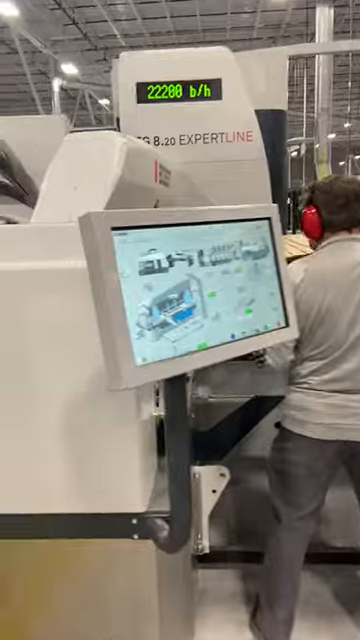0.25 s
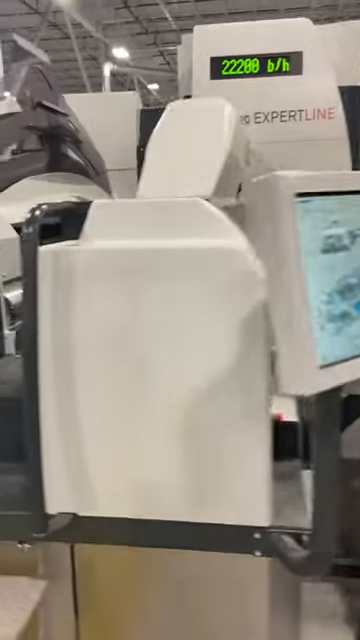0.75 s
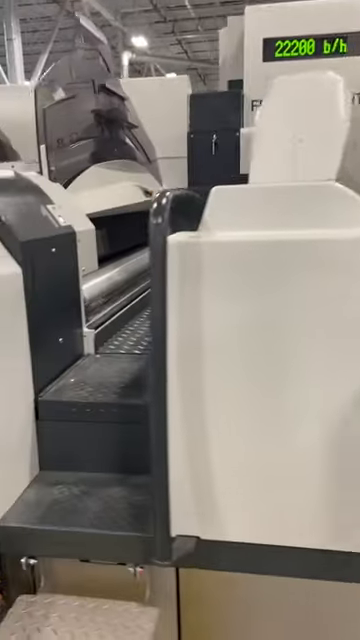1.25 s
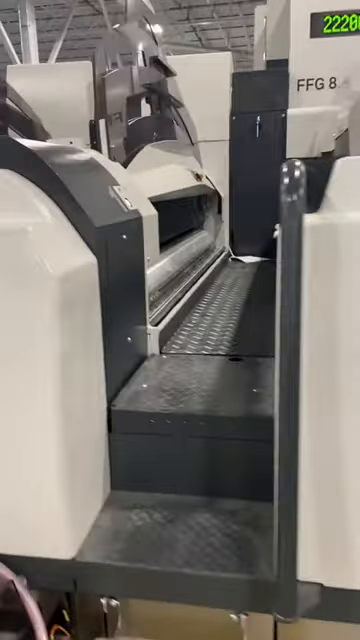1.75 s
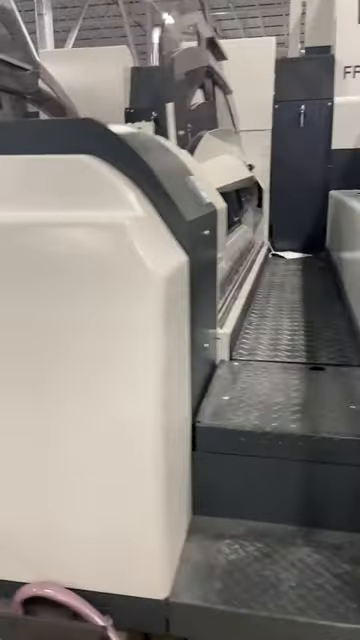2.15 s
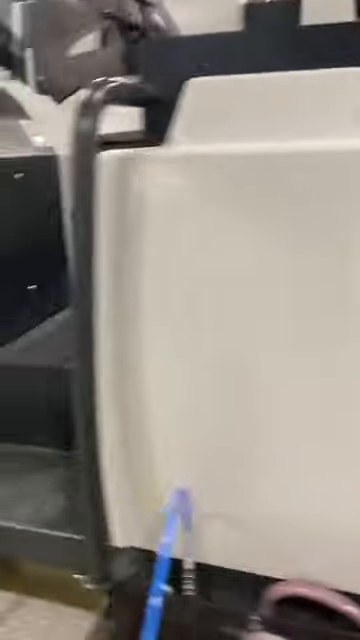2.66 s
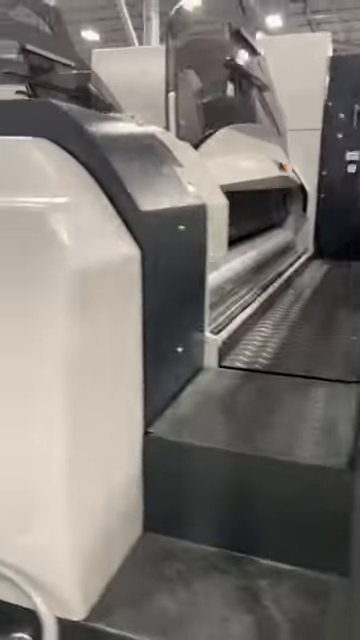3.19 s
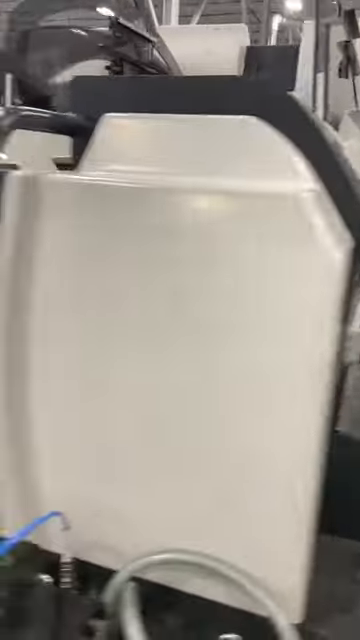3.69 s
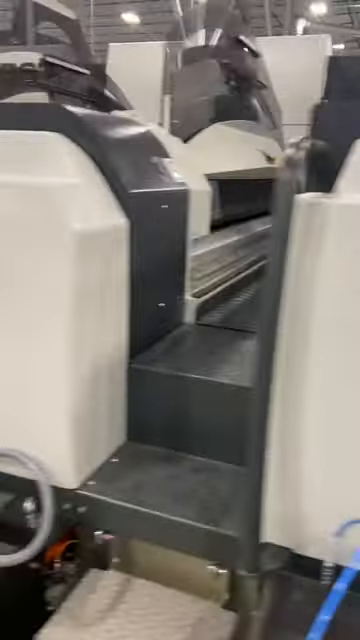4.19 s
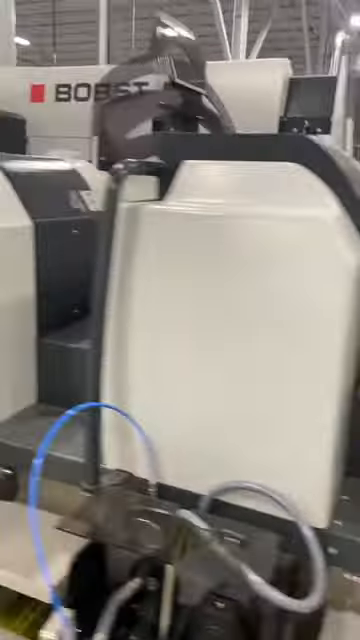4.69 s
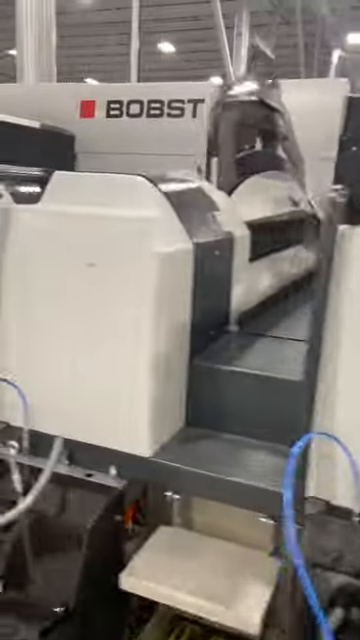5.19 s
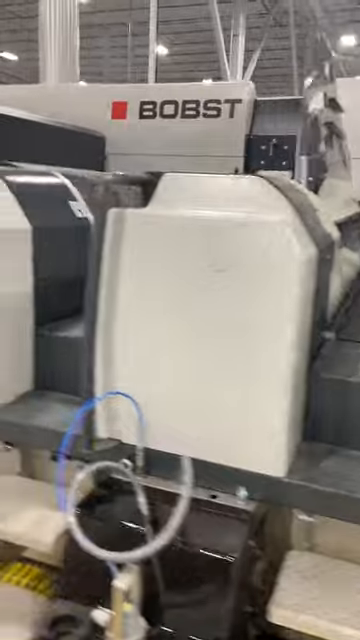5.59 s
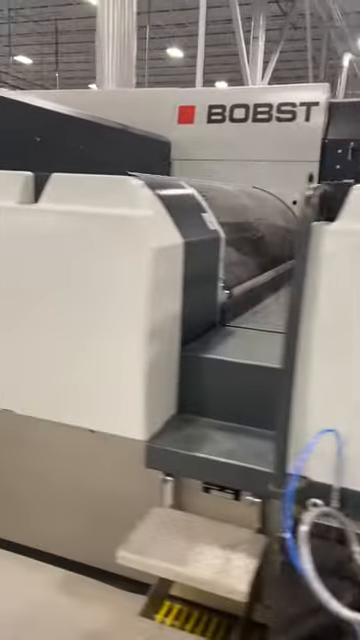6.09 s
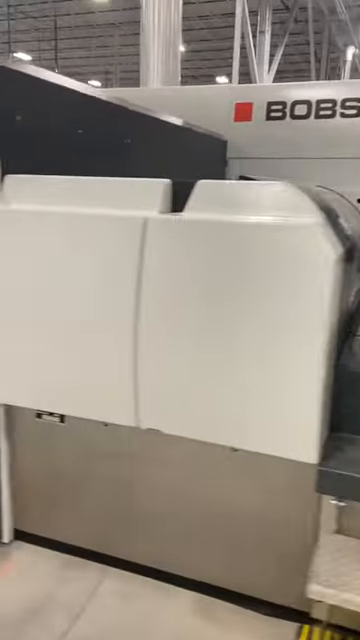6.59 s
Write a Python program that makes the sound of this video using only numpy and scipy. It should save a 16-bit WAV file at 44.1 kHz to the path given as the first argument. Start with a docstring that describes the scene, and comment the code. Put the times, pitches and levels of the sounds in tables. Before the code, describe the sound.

In a large factory hall, a cardboard-folding machine runs very fast, about six cycles a second. Dull booming thumps, slapping sheets, ringing metal and short air puffs repeat in every cycle. As the handheld stereo microphone moves along close by, the slaps fade, a hollow panel note rattles early on, and the sound evens into blower rush, thin whines and faint ticks.

```python
"""A box folder-gluer running at 22200 boxes an hour booms through its covers as one walks along it in a large hall.
Damped blows, a shaking frame, slapping sheets, puffs of air and knocks recur in every machine cycle.
Noise shaped by spectra gives the clatter and rush; resonances excited by noise give the ringing and whines.
The feed end falls behind, leaving the even rush of blowers and rollers, the whine of the drives and a light tick.
Two microphone ports hear it alike in the bass and out of step in the treble."""
import sys
import numpy as np
from scipy import signal
from scipy.fft import rfft, irfft, next_fast_len
from scipy.io import wavfile

SR = 44100
rng = np.random.default_rng(int(sys.argv[2]) if len(sys.argv) > 2 else 0)


def wav_record(signal):
    """Record a signal, one row per channel, as 16-bit PCM in the file named by sys.argv[1]."""
    frames = np.transpose(np.atleast_2d(signal))
    bounded = np.clip(frames, -1, 1)
    # unit amplitude maps onto the largest positive 16-bit level
    quanta = np.round(bounded * 32767).astype(np.int16)
    wavfile.write(sys.argv[1], SR, quanta)


N = 302085
TIME = np.arange(N) / SR
CYCLE = 0.16218  # s, one box

# In all tables nearest_s is when a sound is closest, span_s how long before and after it fades by 1/e.
# Table levels are those of the bare sound, before the gains in its function.

# blows on the covers, one per cycle each: peak_in_cycle_s, level_db, pitch_hz, fade_s, nearest_s, span_s
COVER_BLOWS = [(0.0868, -14.1, 163.2, 0.033, 0.3, 0.35), (0.1604, -13.1, 105.4, 0.054, 0.51, 2.19),
               (0.1028, -12.6, 95.3, 0.022, 0.6, 1.67), (0.0313, -16.8, 80.3, 0.054, 0.97, 1.37),
               (0.066, -22.8, 148.3, 0.054, 1.7, 1.87), (0.1172, -9.1, 141.7, 0.008, 1.71, 1.23),
               (0.0734, -17.6, 71.1, 0.054, 1.75, 2.5), (0.1374, -10.0, 106.9, 0.054, 2.43, 1.94),
               (0.0985, -17.5, 155.0, 0.054, 2.5, 0.75), (0.1325, -13.7, 89.9, 0.037, 2.53, 2.2),
               (0.0884, -15.7, 114.2, 0.022, 2.57, 1.88), (0.0098, -13.8, 102.6, 0.03, 2.72, 2.5),
               (0.1479, -12.9, 106.5, 0.043, 3.17, 0.36), (0.0331, -22.9, 185.0, 0.029, 3.33, 0.84),
               (0.1309, -22.8, 184.2, 0.054, 3.53, 2.5), (0.0962, -13.6, 134.1, 0.054, 4.18, 2.5),
               (0.1355, -22.4, 135.7, 0.054, 4.57, 2.26), (0.0758, -15.3, 122.9, 0.046, 4.58, 1.67),
               (0.0905, -13.3, 68.0, 0.025, 6.03, 0.93), (0.0075, -23.3, 121.0, 0.054, 6.06, 2.39),
               (0.0, -15.4, 139.7, 0.016, 6.13, 0.7), (0.1291, -14.2, 93.0, 0.012, 6.67, 1.29)]
# partials of a blow: pitch_multiple, level_db
BLOW_PARTIALS = [(.62, -14), (1, 0), (1.25, -10.5), (1.8, -15)]
# tone colour of the blows, fullest near 70 and 142 Hz: frequency_hz, gain_db
BLOW_COLOUR = [(30, -5), (50, 0), (70, 1.2), (90, .8), (105, -.8), (125, .7), (142, 1.6), (185, -.5),
               (260, -4)]


def covers(rise_s=0.0098, uneven_db=0.4):
    """Damped free vibration: each unit's blow makes the covers heave for a few swings, loudest as it is passed."""
    out = np.zeros(N)
    turn = np.linspace(-CYCLE / 4, 3 * CYCLE / 4, 1024)
    age = turn + CYCLE * np.arange(2)[:, None]  # the second row is the tail of the blow before
    for peak_s, db, pitch_hz, fade_s, nearest_s, span_s in COVER_BLOWS:
        heave = np.exp(-(np.minimum(age, 0) / rise_s) ** 2 - np.maximum(age, 0) / fade_s)
        swings = sum(amp(part_db) * np.cos(2 * np.pi * multiple * pitch_hz * age)
                     for multiple, part_db in BLOW_PARTIALS)
        one_cycle = (heave * swings).sum(0)
        repeated = np.interp(TIME - peak_s, turn, one_cycle, period=CYCLE)
        out += amp(db) * repeated * passing(nearest_s, span_s)
    size = next_fast_len(N)
    hz = np.fft.rfftfreq(size, 1 / SR)
    coloured = irfft(rfft(out, size) * amp(read(BLOW_COLOUR, hz)), size)[:N]
    return coloured * uneven(uneven_db)


# shaking of the frame: frequency_hz, density_db_per_hz
FRAME_SPECTRUM = [(15, -80), (30, -60), (43, -51), (55, -47.5), (80, -44.5), (130, -45.5), (200, -46.5),
                  (260, -44.5), (370, -53), (470, -49.5), (650, -52), (1000, -65.5), (2000, -66.5),
                  (6000, -100)]


def frame(level_db=-1):
    """Forced vibration: the heavy frame shakes under the working stroke, nearly alike each cycle."""
    working = stroke(start_s=0.038, attack_s=0.032, hold_s=0.057, release_s=0.051, rest_db=-5.0)
    working = working * uneven(spread_db=0.4)
    shaking = rattle(FRAME_SPECTRUM, repeat=0.94, repeat_hz=830)
    return amp(level_db) * shaking * working * passing(nearest_s=2.7, span_s=2.6, far_db=-4.5)


# slap of a sheet entering the rolls: frequency_hz, density_db_per_hz
SLAP_SPECTRUM = [(300, -58.5), (550, -48.5), (780, -57), (1050, -54), (1500, -59), (2200, -58.5),
                 (3000, -70.5), (6000, -71), (12000, -97)]
# sheets heard singly near the feed end: start_s, length_s, level_db
SHEET_SLAPS = [(.045, 0.12, 1), (0.181, .115, 0.5), (0.34, 0.098, 3), (0.5, .11, 1), (0.666, .11, 0.5),
               (0.824, .11, -0.5), (0.99, .11, 0), (1.146, .11, -3), (1.312, 0.11, -3.5), (1.478, .115, -4),
               (1.648, 0.099, -7)]


def sheet_slaps(level_db=-0.5):
    """Impact noise: each sheet slaps into the rolls under its own rounded envelope, with a rising resonance."""
    slapping = sum(amp(db) * swell(start_s, length_s, skew=0.87) for start_s, length_s, db in SHEET_SLAPS)
    noise = rattle(SLAP_SPECTRUM, repeat=0.56, repeat_hz=2000)
    return amp(level_db) * (noise + scoop(level_db=-24)) * slapping


def scoop(level_db, centre_hz=1030, half_width_hz=45, rise_hz_per_s=4500, start_s=0.02):
    """Cavity resonance: it rises as each sheet is drawn in and the gap behind it closes."""
    # a straight rise for a third of the cycle, then a held pitch
    offset_hz = rise_hz_per_s * (np.minimum((TIME - start_s) % CYCLE, CYCLE / 3) - CYCLE / 5)
    shift = np.exp(2j * np.pi * np.cumsum(offset_hz) / SR)
    return (signal.hilbert(resonances([(centre_hz, half_width_hz, level_db)])) * shift).real


# clatter of sheets in the rolls: frequency_hz, density_db_per_hz
CLATTER_SPECTRUM = [(100, -51), (250, -45), (550, -45.5), (800, -52.5), (1150, -50), (1500, -58.5),
                    (2300, -62.5), (3300, -63), (5500, -67), (7500, -76), (10000, -85.5), (15500, -95)]


def sheet_clatter(level_db=-4.2, later_db=-13):
    """Modulated contact noise: sheets clatter through the rolls once a cycle, here and at a later unit."""
    here = stroke(start_s=0.016, attack_s=0.033, hold_s=0.052, release_s=0.06, rest_db=-10.5)
    here = here * uneven(spread_db=0.6) * passing(nearest_s=0.33, span_s=2.23, far_db=-15.5)
    later = stroke(start_s=0.042, attack_s=0.028, hold_s=0.045, release_s=0.04, rest_db=-15)
    later = later * passing(nearest_s=3.55, span_s=1.1)
    noise = rattle(CLATTER_SPECTRUM, repeat=0.67, repeat_hz=900)
    return noise * np.hypot(amp(level_db) * here, amp(later_db) * later)


# sheet-metal resonances of the feed end: frequency_hz, half_width_hz, level_db
METAL_RINGS = [(563, 18, -30), (1116, 14, -35.5)]


def sheet_metal():
    """Resonance: the sheet metal rings in each cycle, here and at a later unit."""
    ringing = stroke(start_s=0.047, attack_s=0.022, hold_s=0.081, release_s=0.051, rest_db=-10)
    here = passing(nearest_s=0.37, span_s=1.3, far_db=-8.5)
    later = amp(-12) * passing(nearest_s=3.66, span_s=0.35)
    return resonances(METAL_RINGS) * ringing * uneven(spread_db=1) * (here + later)


def feeder():
    """Superposition: slaps and clatter share the flutter of many small contacts, and the sheet metal rings."""
    flutter = uneven(spread_db=1.5, every_s=0.005)
    return (sheet_slaps() + sheet_clatter()) * flutter + sheet_metal()


# sheets and guides clacking out of the clatter: peak_s, level_db, centre_hz
CLACK_EVENTS = [(0.092, -14, 460), (0.127, -20, 540), (0.223, -19, 600), (0.366, -19, 620),
                (0.391, -15, 490), (0.556, -16, 420), (0.593, -18, 620), (0.715, -16, 380),
                (0.755, -17, 570), (0.88, -18, 440), (1.037, -16, 450), (1.201, -19, 340),
                (1.239, -18, 580), (1.336, -19, 530), (1.38, -20, 410), (1.541, -20, 590), (1.7, -16, 540),
                (1.767, -21, 450), (1.859, -18, 680), (2.033, -19, 500), (2.171, -18, 470),
                (2.345, -20, 360), (2.402, -22, 640), (2.505, -19, 410), (2.674, -20, 560),
                (2.835, -22, 420), (2.858, -19, 520), (3.01, -21, 540), (3.161, -22, 460),
                (3.311, -22, 830), (3.359, -21, 450), (3.477, -22, 440), (3.503, -20, 560),
                (3.544, -21, 520), (3.64, -21, 330), (3.674, -20, 500), (4.005, -19, 470),
                (4.156, -20, 390), (4.448, -24, 420), (4.616, -21, 370), (4.639, -23, 630),
                (4.711, -21, 360), (4.941, -24, 590), (5.011, -24, 490), (5.103, -20, 530),
                (5.213, -25, 520), (5.279, -23, 530), (5.302, -20, 470), (5.399, -22, 560),
                (5.545, -23, 450), (5.619, -24, 450), (5.712, -24, 580), (5.784, -23, 560),
                (5.869, -25, 590), (5.934, -21, 390), (6.026, -25, 630), (6.083, -24, 580),
                (6.196, -24, 590), (6.277, -22, 450), (6.41, -25, 420), (6.432, -25, 600),
                (6.492, -24, 460), (6.589, -22, 550), (6.753, -21, 380)]


def clacks(level_db=-1.0, edge_db=-16, edge_hz=1500, count=12, rise_s=0.003, fade_s=0.009, spread_octaves=0.5):
    """Modal excitation: each clack shakes fresh damped panel modes, with a brighter edge from the contact."""
    out = np.zeros((2, N))
    for peak_s, db, centre_hz in CLACK_EVENTS:
        near = abs(TIME - peak_s) < CYCLE / 2
        age = TIME[near] - peak_s
        blow = np.exp(-(np.minimum(age, 0) / rise_s) ** 2 - np.maximum(age, 0) / fade_s)
        for hz, part_db in ((centre_hz, level_db), (edge_hz, edge_db)):
            modes_hz = hz * 2 ** (spread_octaves * rng.standard_normal((count, 1)))
            angle = 2 * np.pi * (modes_hz * age + rng.random((count, 1)))
            left = np.cos(angle).sum(0)
            right = np.cos(angle - read(PORT_LEAD, modes_hz)).sum(0)
            ring = blow * np.array([left, right])
            evened = np.sqrt(np.mean(blow ** 2) / np.mean(ring ** 2))
            out[:, near] += amp(db + part_db) * ring * evened
    return out


# linkage knocks, one per cycle each: start_in_cycle_s, level_db, centre_hz, nearest_s, span_s
LINKAGE_KNOCKS = [(.105, -21, 248, .35, 0.75), (0.062, -23, 450, 0.72, 0.47),
                  (0.0623, -22, 420, 2.33, 0.63), (0.084, -22.5, 230, 3.12, 0.63),
                  (.065, -24.5, 590, 3.5, .5), (.09, -27, 340, 5.2, 1.5), (.018, -28, 330, 5.7, 1.1)]


def knocks(half_width_share=0.2):
    """Broad, heavily damped resonance: linkages knock dully once a cycle, each heard as it is passed."""
    out = 0
    for start_s, db, hz, nearest_s, span_s in LINKAGE_KNOCKS:
        knocking = stroke(start_s, attack_s=0.013, hold_s=0.014, release_s=0.068, rest_db=-16)
        dull = resonances([(hz, half_width_share * hz, db)])
        out = out + dull * knocking * passing(nearest_s, span_s)
    return out


# hiss of escaping air: frequency_hz, density_db_per_hz
AIR_SPECTRUM = [(1000, -83), (3000, -86), (5500, -66), (7500, -72.5), (9500, -75), (12000, -76.5),
                (15500, -80)]


def air(feed_db=-1.0, folder_db=-11, vent_db=-4, vent_s=2.235, vent_rise_s=0.04, vent_fade_s=0.058):
    """Turbulent jet noise: puffs once a cycle at the feed end, fainter at the folder, and one valve hiss."""
    puffs = stroke(start_s=0.14, attack_s=0.043, hold_s=0.021, release_s=0.055, rest_db=-10.0)
    feed = amp(feed_db) * passing(nearest_s=0.25, span_s=1.22, far_db=-20)
    folder = amp(folder_db) * passing(nearest_s=7.4, span_s=1.2)
    age = TIME - vent_s
    opening = np.clip(age / vent_rise_s, 0, 1)
    emptying = np.exp(-np.maximum(age - vent_rise_s, 0) / vent_fade_s)
    vent = amp(vent_db) * opening * emptying
    return rattle(AIR_SPECTRUM, repeat=0.1, repeat_hz=1500) * np.hypot(puffs * (feed + folder), vent)


# hums of a hollow guard panel: start_s, length_s, level_db
PANEL_HUMS = [(.85, .11, -21), (1.007, 0.13, -17), (1.19, 0.12, -18), (1.367, .09, -21), (1.5, .1, -22.5),
              (1.667, 0.13, -15), (1.83, .145, -15), (1.985, 0.12, -17.5), (2.13, 0.13, -20.5)]
# resonances beside its note: frequency_hz, half_width_hz, level_db
PANEL_RINGS = [(545, 28, -8), (630, 40, -7.5)]


def hollow(level_db=-3.3, pitch_hz=560, waver_hz=7.05):
    """Panel resonance: a guard panel swells into a hollow, rattling note at set times."""
    waver = np.interp(TIME / CYCLE * 4, np.arange(N // 100), rng.standard_normal(N // 100))
    hz = pitch_hz + waver_hz * waver
    note = np.sqrt(2) * np.sin(2 * np.pi * np.cumsum(hz) / SR)
    rattling = uneven(spread_db=2.5, every_s=0.006)
    humming = sum(amp(db) * swell(start_s, length_s, skew=0.84) ** 0.81 for start_s, length_s, db in PANEL_HUMS)
    return amp(level_db) * (note * rattling + resonances(PANEL_RINGS)) * humming


# blurred tick: frequency_hz, density_db_per_hz
TICK_SPECTRUM = [(800, -78), (2000, -64.5), (3500, -62), (5500, -68), (7500, -68.5), (10000, -82),
                 (15500, -90)]


def tick(level_db=-5.5):
    """Amplitude-modulated noise: a light, blurred tick once a cycle from further down the line."""
    ticking = stroke(start_s=0.01, attack_s=0.016, hold_s=0.005, release_s=0.031, rest_db=-9.0)
    ticking = ticking * uneven(spread_db=1.3)
    noise = rattle(TICK_SPECTRUM, repeat=0.3, repeat_hz=1500)
    return amp(level_db) * noise * ticking * passing(nearest_s=5.6, span_s=1.02, far_db=-23)


def chatter(level_db=-40.5, low_hz=1200, high_hz=3900, ring_s=0.016, spread_db=3, count=700):
    """Random impacts: chains and loose guides make many briefly ringing contacts, nearer towards the folder."""
    out = np.zeros((2, N))
    age = np.arange(SR // 16) / SR
    ring = np.exp(-age / ring_s) - np.exp(-4 * age / ring_s)
    for when, place, size, side in rng.random((count, 4)):
        hz = low_hz * (high_hz / low_hz) ** place
        lag = np.array([[0], [read(PORT_LEAD, hz) + np.pi * (side - 0.5)]])
        strength = amp(spread_db * min(-np.log(1 - size), 3))
        contact = strength * ring * np.sin(2 * np.pi * hz * age - lag)
        part = out[:, int(when * N):][:, :len(age)]
        part += contact[:, :part.shape[1]]
    return amp(level_db) * out / out.std() * passing(nearest_s=5.4, span_s=2.2, far_db=-3)


# brief swells of the whines: peak_s, length_s, pitch_hz, level_db
WHINE_SWELLS = [(.75, .14, 2483, -42), (1.36, .14, 2483, -42), (2.67, .2, 2483, -40), (3.0, .28, 3198, -45),
                (3.63, .16, 2483, -41), (3.64, .2, 3685, -45), (3.87, .2, 3198, -40),
                (4.06, .14, 2483, -43), (4.45, .2, 3198, -44), (4.71, .16, 3685, -44),
                (5.22, .12, 3198, -44)]


def whine_swells(level_db=1.0, waver_hz=9):
    """Standing waves: whines swell briefly, wavering, as one walks through louder and softer spots."""
    out = np.zeros((2, N))
    for peak_s, length_s, hz, db in WHINE_SWELLS:
        near = abs(TIME - peak_s) < length_s / 2
        age = TIME[near] - peak_s
        waver = np.sin(2 * np.pi * (waver_hz * age + rng.random()))
        angle = 2 * np.pi * (hz * age + rng.random()) + waver
        arch = np.sqrt(2) * np.cos(np.pi * age / length_s)
        out[:, near] += amp(db) * arch * np.sin([angle, angle - read(PORT_LEAD, hz)])
    return amp(level_db) * out


# drive and gear whines: frequency_hz, half_width_hz, level_db
DRIVE_WHINES = [(920.5, 4.5, -39.8), (1241, 3, -43), (1600, 5, -49), (2105, 4, -50), (2325, 24, -49),
                (2483, 7, -46.5), (2690, 4, -49.5), (2815, 5, -52.5), (2920, 14, -51), (3680, 24, -48.5),
                (3725, 9, -51.5), (4004, 8, -55), (4120, 8, -56), (4620, 24, -55), (4968, 26, -52.5)]
# whirr of the folder belts' pulleys: frequency_hz, half_width_hz, level_db
PULLEY_WHIRR = [(885, 14, -47), (1241, 5, -45), (1305, 10, -46.5), (1838, 8, -51), (2338, 36, -45),
                (2440, 90, -45.5), (3385, 15, -52), (4665, 28, -49)]
# a faint, nearly steady bearing whine: frequency_hz, half_width_hz, level_db
BEARING_WHINE = [(3198, 14, -40)]


def drives(whine_db=0.05, bearing_db=-9):
    """Narrow-band resonance: drives and, faintly, a bearing whine and waver; pulleys whirr grainily."""
    whines = amp(whine_db) * resonances(DRIVE_WHINES) * passing(nearest_s=3.8, span_s=2.2, far_db=-0.5)
    grain = uneven(spread_db=3, every_s=0.008)
    pulleys = resonances(PULLEY_WHIRR) * passing(nearest_s=5.5, span_s=1.7) * grain
    bearing = amp(bearing_db) * resonances(BEARING_WHINE) * passing(nearest_s=3.3, span_s=2.7, far_db=-1)
    return (whines + pulleys + bearing) * uneven(spread_db=2, every_s=0.03)


# rush of blowers and rollers: frequency_hz, density_db_per_hz
HALL_SPECTRUM = [(20, -72), (45, -45), (130, -46.5), (200, -48), (330, -52), (520, -50.8), (750, -55.5),
                 (1100, -59.7), (1500, -63.5), (2300, -64), (3300, -68.5), (5500, -74.5), (7500, -83.5),
                 (10000, -84.5), (15500, -90)]


def hall(rush_db=0.03, shade_db=-0.92):
    """Diffuse field: the hall smears blowers and rollers into an even rush, dipping slightly midway."""
    gain = amp(rush_db + shade_db * passing(nearest_s=2.7, span_s=1.6))
    return rattle(HALL_SPECTRUM, repeat=0.85, repeat_hz=597) * gain


# low hums of the machine, the highest only near 4.9 s: frequency_hz, level_db, nearest_s, span_s
LOW_HUMS = [(43.2, -37.5, 4.4, 5), (49.4, -35.5, 4.4, 5), (136.8, -30.5, 4.9, 1.3)]
# drone of the folder's drive: frequency_hz, half_width_hz, level_db
DRIVE_DRONE = [(118, 10, -33), (184, 4, -32), (240, 14, -39), (317, 20, -37)]


def low_hums():
    """Pure tones and resonance: low hums of the machine slowly swell and fade; a drive drones near the folder."""
    hum = 0
    for hz, db, nearest_s, span_s in LOW_HUMS:
        sine = np.sqrt(2) * np.sin(2 * np.pi * (hz * TIME + rng.random()))
        hum = hum + amp(db) * sine * passing(nearest_s, span_s)
    return hum + resonances(DRIVE_DRONE) * passing(nearest_s=4.8, span_s=2.4)


def amp(db):
    """Logarithmic level: decibels to gain."""
    return np.exp(np.asarray(db) * np.log(10) / 20)


def read(points, hz):
    """Interpolation: a curve joined by straight lines on a log-frequency axis."""
    f, value = np.transpose(points)
    return np.interp(np.log(hz + 1), np.log(f + 1), value)


def passing(nearest_s, span_s, far_db=-60):
    """Direct and reverberant field: a passed unit swells above what the hall carries from afar."""
    direct = np.exp(-((TIME - nearest_s) / span_s) ** 2)
    return np.sqrt(direct + amp(far_db) ** 2 * (1 - direct))


def stroke(start_s, attack_s, hold_s, release_s, rest_db):
    """Periodic envelope: once a cycle the gain rises from its resting level, holds and falls back."""
    age = (TIME - start_s) % CYCLE
    corners = np.cumsum([0, attack_s, hold_s, release_s])
    current = np.interp(age, corners, [0, 1, 1, 0])
    previous = np.interp(age + CYCLE, corners, [0, 1, 1, 0])
    return amp(rest_db * (1 - np.maximum(current, previous)))


def swell(start_s, length_s, skew):
    """Transient envelope: one rounded arch; a skew under 1 brings its top forward."""
    return np.sin(np.pi * np.clip((TIME - start_s) / length_s, 0, 1) ** skew)


def uneven(spread_db, every_s=CYCLE):
    """Random modulation at unit power: from cycle to cycle, or much faster as the flutter of small contacts."""
    chance = rng.standard_normal(N // 100)
    gain = amp(spread_db * np.interp(TIME / every_s, np.arange(len(chance)), chance))
    return gain / np.sqrt(np.mean(gain ** 2))


# phase by which the left port leads: frequency_hz, lead_rad
PORT_LEAD = [(90, 0), (250, -.08), (500, -.35), (1200, -.4), (1900, -.1), (2300, 1.0), (3600, .55),
             (5400, 1.0), (6900, 3.0), (8000, 3.35), (9700, 6.1), (11400, 6.6), (12700, 9.2), (14400, 9.6),
             (15800, 12.3)]
# how much louder the right port is: frequency_hz, difference_db
PORT_TILT = [(40, 0), (150, 0.7), (450, 0.8), (1100, 1.2), (1700, 1), (2100, 0), (4500, .7), (6000, -.3),
             (8000, 0)]
# part of the right port unrelated to the left: frequency_hz, share_db
PORT_APART = [(20, -52), (70, -31), (130, -20.5), (250, -20.5), (400, -9), (800, -4), (1800, -4),
              (2250, -1.5), (2800, -4), (4200, -1), (4900, -0.5), (7200, -58.5), (9000, -8), (13500, -16),
              (15500, -2.5)]


def ports(z, hz):
    """Spatial coherence: two unrelated spectra become a pair, alike in the bass, out of step in the treble."""
    apart = np.minimum(amp(read(PORT_APART, hz)), 1)
    mixed = np.sqrt(1 - apart ** 2) * z[0] + apart * z[1]
    right = mixed * np.exp(-1j * read(PORT_LEAD, hz))
    tilt = amp(read(PORT_TILT, hz) / 2)
    return np.array([z[0] / tilt, right * tilt])


def complex_noise(shape):
    """Gaussian noise: a random spectrum of unit power."""
    return (rng.standard_normal(shape) + 1j * rng.standard_normal(shape)) / np.sqrt(2)


def rattle(spectrum, repeat, repeat_hz):
    """Cyclic correlation: noise returns alike each cycle; short waves lose likeness first as one moves."""
    size = round(CYCLE * SR)
    hz, cycles = np.fft.rfftfreq(size, 1 / SR), N // size + 2
    z = complex_noise((2, cycles, len(hz)))
    kept = np.clip(repeat * np.exp(-hz / repeat_hz), 0, 0.99)
    for k in range(1, cycles):
        z[:, k] = kept * z[:, k - 1] + np.sqrt(1 - kept ** 2) * z[:, k]
    waves = irfft(ports(z, hz) * amp(read(spectrum, hz)), size) * np.sqrt(size * SR / 2)
    # each cycle starts with a short equal-power crossfade from the one before
    blend = np.minimum(np.arange(size) / 256, 1) * np.pi / 2
    joined = waves[:, :-1] * np.cos(blend) + waves[:, 1:] * np.sin(blend)
    return joined.reshape(2, -1)[:, :N]


def resonances(modes):
    """Steady-state resonance: narrow peaks kept ringing by random excitation."""
    size = next_fast_len(N)
    hz = np.fft.rfftfreq(size, 1 / SR)
    power = np.zeros(len(hz))
    for centre_hz, half_width_hz, db in modes:
        peak = 1 / (1 + ((hz - centre_hz) / half_width_hz) ** 2) ** 2
        power += amp(db) ** 2 * peak / peak.sum()
    pair = ports(complex_noise((2, len(hz))), hz)
    return irfft(pair * np.sqrt(power / 2) * size, size)[:, :N]


def scene():
    """Superposition: the machine's strokes over its whines, the hall and the low hums."""
    strokes = covers() + frame() + feeder() + clacks() + knocks() + air() + hollow() + tick()
    return strokes + chatter() + whine_swells() + drives() + hall() + low_hums()


def record(dry, low_cut_hz=28, edge_hz=15800):
    """Saturation and filtering: the highest peaks are rounded, then a low cut and a band limit follow."""
    rounded = dry / (1 + dry ** 8) ** (1 / 8)
    low_cut = signal.butter(2, low_cut_hz, "highpass", fs=SR, output="sos")
    thinned = signal.sosfiltfilt(low_cut, rounded)
    band_limit = signal.firwin(511, edge_hz, window=("kaiser", 9), fs=SR)
    return signal.oaconvolve(thinned, band_limit[None], "same")


dry = scene()
out = record(dry)
wav_record(out)
```